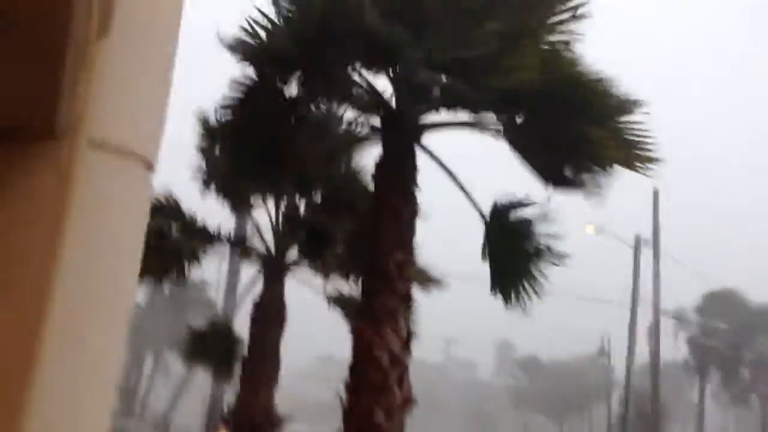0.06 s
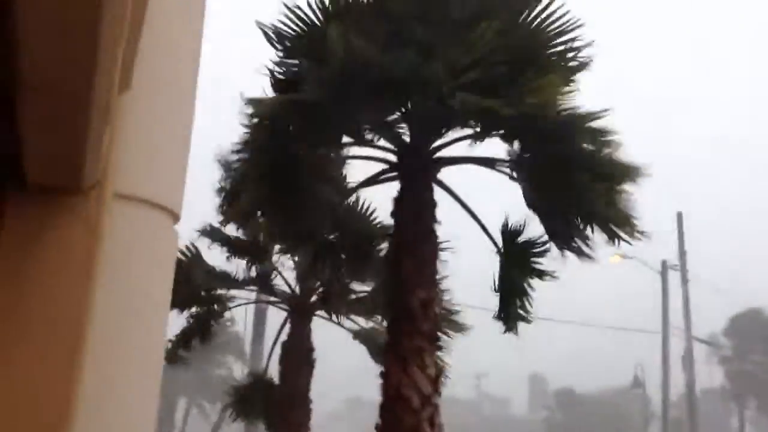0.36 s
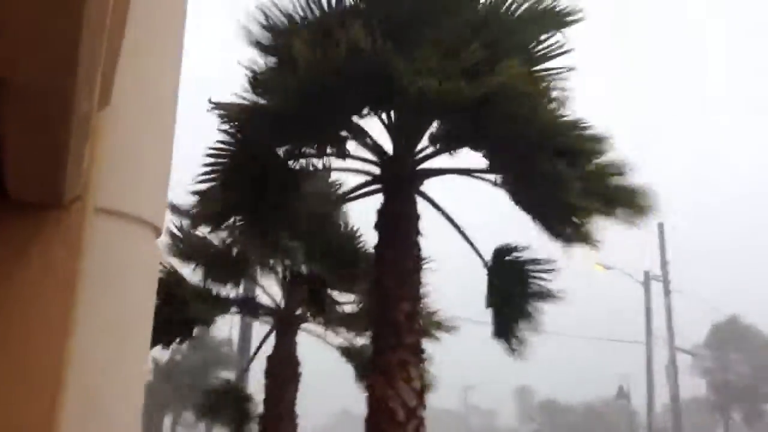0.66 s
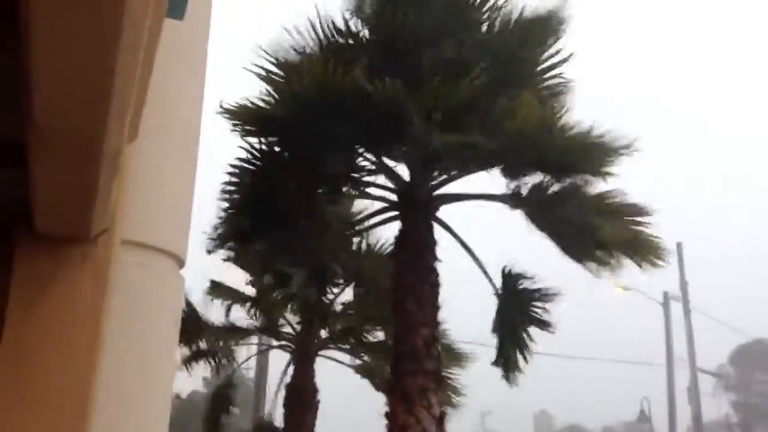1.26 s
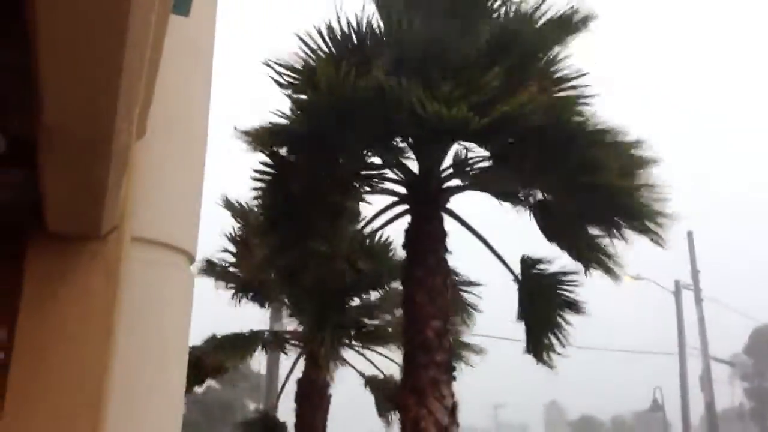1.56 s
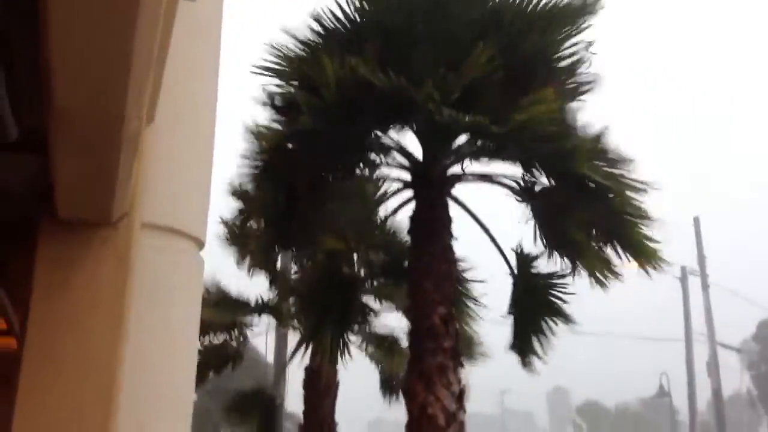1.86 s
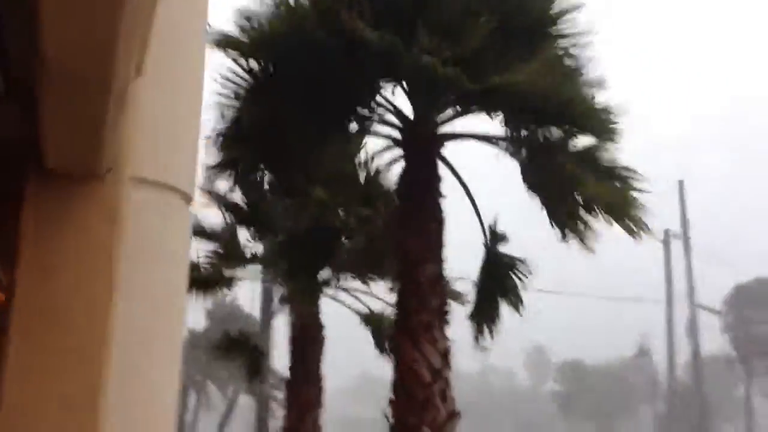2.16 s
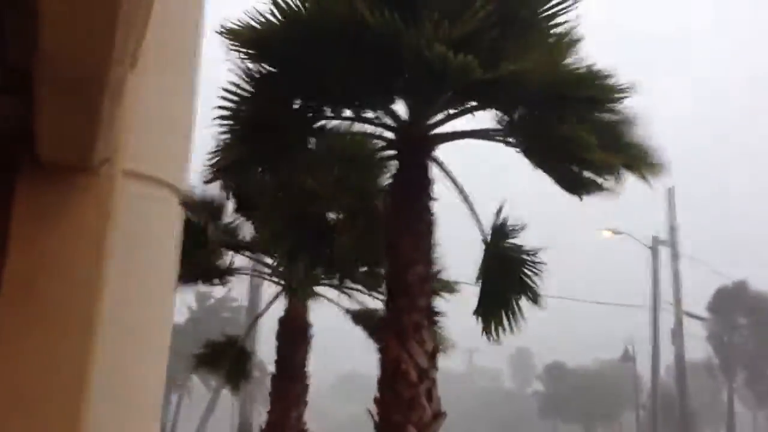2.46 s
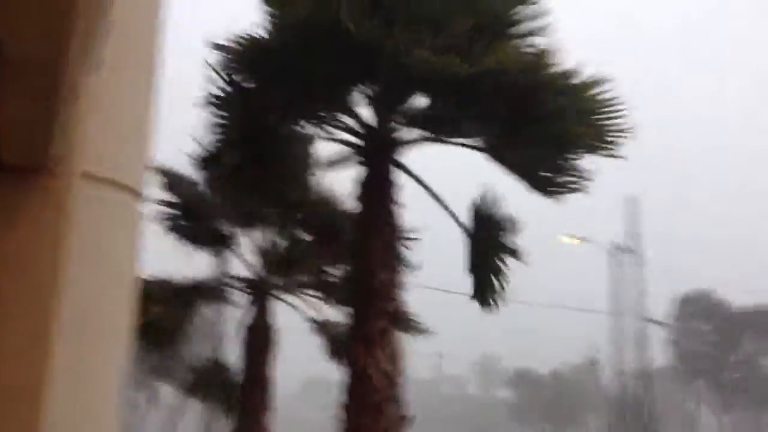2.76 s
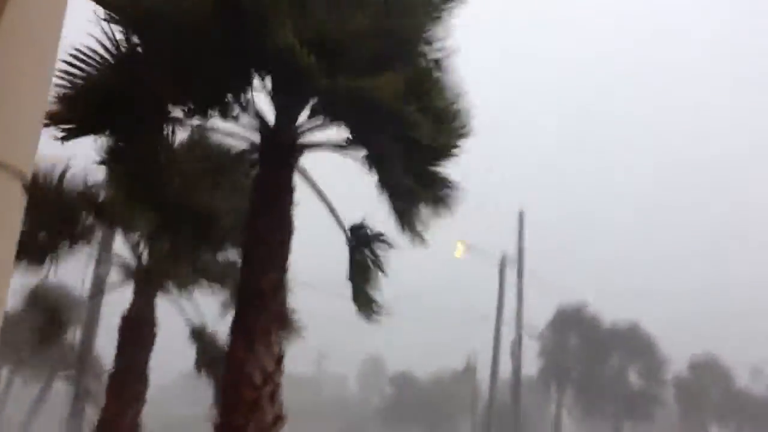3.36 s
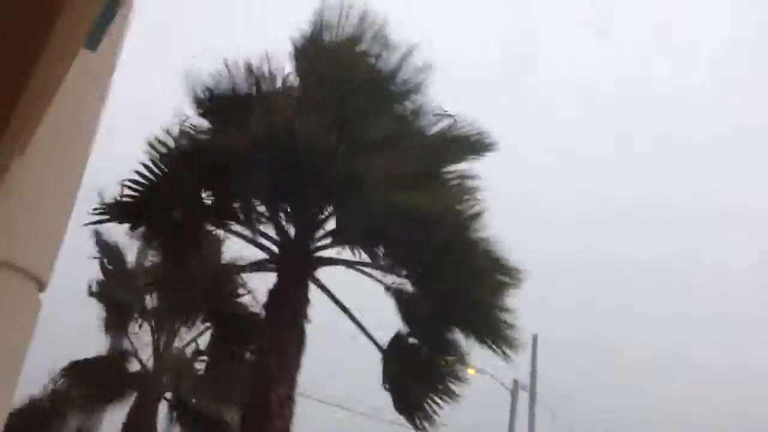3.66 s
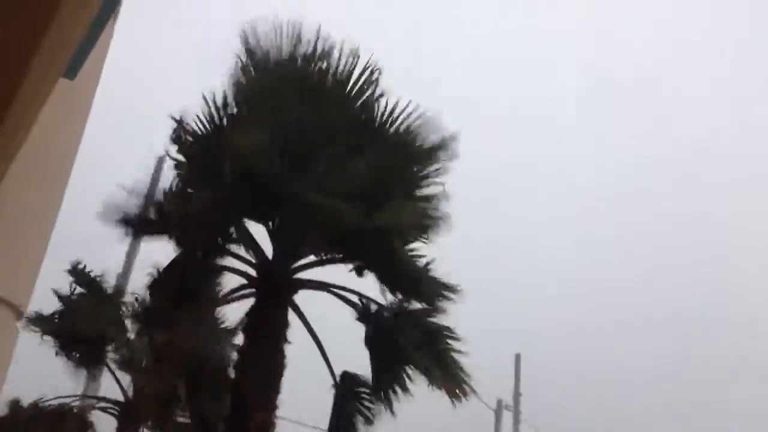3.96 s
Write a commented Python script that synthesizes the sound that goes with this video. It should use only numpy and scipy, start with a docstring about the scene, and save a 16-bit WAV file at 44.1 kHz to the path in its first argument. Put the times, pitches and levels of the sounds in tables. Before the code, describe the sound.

Storm wind blows throughout, heard from under a porch: a steady hiss of rain and thrashing palm fronds over a low roar and faint moaning. Flurries of short low puffs buffet the microphone at about 1.1 to 1.5 seconds and 2.3 to 2.5. The hardest come around 3.5 seconds, briefly dipping the hiss as the roar swells. One drop taps the microphone at 3.8 seconds.

```python
"""A hiss of rain and palm fronds, driven by storm wind, is heard from under a porch.
Beneath it the turbulent air roars, and moans round wires and eaves.
Eddies slap the microphone in flurries of short low puffs; the hardest make the limiter
duck the hiss, which then creeps back. Near the end one drop taps the microphone's housing."""
import sys
import numpy as np
from scipy import signal
from scipy.fft import rfft, irfft, next_fast_len
from scipy.io import wavfile
from scipy.ndimage import uniform_filter1d, minimum_filter1d, map_coordinates

SR = 44100
rng = np.random.default_rng(int(sys.argv[2]) if len(sys.argv) > 2 else 0)


def wav_record(signal):
    """Record a signal, one row per channel, as 16-bit PCM in the file named by sys.argv[1]."""
    frames = np.transpose(np.atleast_2d(signal))
    bounded = np.clip(frames, -1, 1)
    # unit amplitude maps onto the largest positive 16-bit level
    quanta = np.round(bounded * 32767).astype(np.int16)
    wavfile.write(sys.argv[1], SR, quanta)


N = 176400

# force of the storm on rain and fronds: t/s, relative level/dB
GUST_LEVEL = [(0, -1), (.3, -0.5), (.62, 0), (.78, -1.2), (.87, 0.6), (1.0, 1.1), (1.2, -1.2), (1.36, -2.4),
              (1.6, -.5), (1.68, -0.7), (1.85, 0.1), (2.3, -0.7), (2.5, 0.8), (2.76, 0.2), (2.86, 2.5),
              (2.93, 1.5), (3.08, 0.7), (3.17, 1.5), (3.45, 2), (3.7, 1.5), (3.95, 1.7)]
# spectrum of the sheet of rain: f/Hz, relative level/dB
RAIN_SPECTRUM = [(400, -21), (900, 4.5), (1500, -0.5), (3000, 1), (5000, -3), (7500, -3), (10000, -4),
                 (13500, -3.5), (15500, -4)]
# spectrum of the fronds: f/Hz, relative level/dB
FROND_SPECTRUM = [(700, -13), (1500, 0.5), (2800, 0.5), (4000, 1), (6000, -2.5), (12000, -16)]
# surges that whip the fronds: t/s, half-width/s, boost/dB
FROND_SURGES = [(.93, .06, 0.5), (2.785, 0.018, 1.5), (2.864, 0.017, 2.5), (3.18, 0.023, 2.5)]
# spectrum of the roar: f/Hz, relative level/dB
ROAR_SPECTRUM = [(25, -21), (50, -2), (85, -8), (130, -1), (185, 1), (300, -4.5), (450, -7.5), (800, -10),
                 (1500, -19.5), (4000, -50)]
# swell of the roar: t/s, relative level/dB
ROAR_SWELL = [(0, -1), (.55, -0.5), (1.05, 2.5), (1.65, -5), (2.2, -1.5), (2.48, -4), (2.65, -7),
              (2.76, -2), (3.1, -4.5), (3.6, 4), (4, 6)]
# wind tones: f/Hz, half-width/Hz, relative level/dB
MOAN_BANDS = [(518, 110, 1), (702, 84, 2), (836, 600, -33)]
# swell of the moaning: t/s, level/dB
MOAN_SWELL = [(0, -45.5), (.6, -42), (1.2, -45.5), (1.7, -41.5), (2.25, -43), (2.6, -47), (2.85, -42),
              (3.25, -39), (3.6, -44), (4, -43)]
# eddies at the microphone: peak t/s, length/s, relative level/dB, bright part against low part/dB
EDDIES = [(0.182, 0.0054, -30, -1.5), (0.583, 0.01, -29, -24), (1.105, 0.0094, -24, -26),
          (1.131, 0.013, -17.5, -17), (1.144, 0.0055, -12.5, -4.5), (1.216, 0.026, -27, -24),
          (1.239, 0.014, -20.5, -8), (1.266, 0.0088, -23, -22), (1.286, 0.0088, -12.5, -9.5),
          (1.31, 0.012, -12, -11), (1.377, 0.0082, -21, -8), (1.404, 0.009, -14.5, -2.5),
          (1.427, 0.011, -18, -3.5), (1.452, 0.017, -20, -27), (1.532, 0.026, -29.5, -6.5),
          (1.864, 0.016, -32.5, -4.5), (2.12, 0.0034, -29, -21), (2.273, 0.0073, -23, 0),
          (2.294, 0.011, -15.5, -7), (2.315, 0.011, -16, -6), (2.33, 0.008, -14.5, 0),
          (2.353, 0.0099, -21, -0.5), (2.369, 0.0091, -9, 5), (2.416, 0.012, -19, -5.5),
          (2.458, 0.01, -17, 0.5), (2.743, 0.018, -27, -25), (2.908, 0.012, -19, -6),
          (2.958, 0.037, -21.5, -4.5), (3.005, 0.0073, -19.5, 3), (3.239, 0.016, -20.5, -9),
          (3.413, 0.011, -21, -9), (3.428, 0.0069, -13, 6), (3.449, .016, -8.5, -3.5),
          (3.473, 0.012, -4, -.5), (3.513, 0.017, -9, -4.5), (3.522, 0.008, -12.5, -1),
          (3.534, 0.0074, -12.5, -5), (3.657, 0.0099, -17, 0), (3.683, 0.015, -14.5, 3),
          (3.719, 0.0075, -14.5, -5.5)]
# spectrum of an eddy's low part: f/Hz, relative level/dB
PUFF_SPECTRUM = [(30, -3.5), (60, -3), (90, -11), (140, 1.5), (200, 3.5), (280, 3.5), (480, -12),
                 (700, -14.5), (1000, -45), (1600, -34), (4000, -72)]
# spectrum of its bright tearing: f/Hz, relative level/dB
TEAR_SPECTRUM = [(100, -13), (300, 1), (480, 4.5), (750, -7.5), (1200, -20.5), (2000, -35), (4000, -56),
                 (9000, -80)]
# modes of the housing: f/Hz, relative level/dB, T60/s
HOUSING_MODES = [(535, -1.5, 0.0096), (985, -10, 0.05), (1550, 0, 0.013), (2110, 6, 0.0044)]

RAIN_DB, FRONDS_DB, SPLASH_DB, ROAR_DB, PUFF_DB = -36, -39.5, -49.5, -38.5, -2.5  # base gains
LOW_CUT_HZ, TOP_HZ = 132, 15550


def amp(db):
    """Decibels to amplitude ratio."""
    return 10 ** (np.asarray(db) / 20)


def unit(x):
    """Scale to rms 1."""
    return x / np.sqrt(np.mean(x ** 2) + 1e-20)


def curve(rows):
    """Interpolate (t/s, value) points at every sample."""
    return np.interp(np.arange(N) / SR, *np.transpose(rows))


def wobble(per_s):
    """A smooth random curve with per_s knots a second."""
    return map_coordinates(rng.standard_normal(1024), [np.arange(N) * per_s / SR], mode="mirror")


def filtered(x, response):
    """Linear filtering: multiply the spectrum by a frequency response."""
    size = next_fast_len(N + SR // 2)
    return irfft(rfft(x, size) * response(np.fft.rfftfreq(size, 1 / SR)), size)[..., :N]


def coloured(x, spectrum):
    """Shape x by (f/Hz, level/dB) points on a log frequency axis, then scale to rms 1."""
    f, db = np.transpose(spectrum)
    return unit(filtered(x, lambda hz: amp(np.interp(np.log(hz + 1), np.log(f + 1), db))))


def rush(spectrum, patchy_db):
    """Coloured noise, modulated in random patches of time and frequency."""
    cells = signal.stft(rng.standard_normal(N), nperseg=512)[2]
    patches = uniform_filter1d(rng.standard_normal(cells.shape), size=7, axis=0)
    patches = unit(uniform_filter1d(patches, size=14, axis=1))
    noise = signal.istft(cells * amp(patchy_db * patches), nperseg=512)[1][:N]
    return coloured(noise, spectrum)


def rain(gust_db):
    """Countless drop impacts add incoherently to a broadband hiss that follows the gusts."""
    return amp(RAIN_DB + gust_db + 0.083 * wobble(11)) * rush(RAIN_SPECTRUM, patchy_db=0.47)


def fronds(gust_db):
    """Forced motion: wind thrashes the fronds, whose hiss grows with each gust and surge."""
    t = np.arange(N) / SR
    surge_db = sum(db * 2 ** -((t - peak_s) / width) ** 2 for peak_s, width, db in FROND_SURGES)
    level_db = FRONDS_DB + 0.72 * gust_db + surge_db + 0.32 * wobble(15)
    return amp(level_db) * rush(FROND_SPECTRUM, patchy_db=1.5)


def splashes(gust_db, per_s=720, centre_hz=3940, t60_cycles=5.2):
    """Impacts excite damped oscillations: near drops and leaves tick at random pitch and size."""
    count = int(per_s * N / SR)
    when, pitch, size = rng.random((count, 3)).T[:, :, None]
    age = np.arange(SR // 250)  # samples since impact
    cycles = np.minimum(centre_hz * 3 ** (2 * pitch - 1), TOP_HZ) * age / SR
    strength = amp(-4 * np.log(1 - .99 * size))  # many faint, few loud
    ticks = strength * np.sin(2 * np.pi * cycles) * np.exp(-np.log(1000) * cycles / t60_cycles)
    samples = (when * N).astype(int) + age
    patter = np.bincount(samples.ravel(), ticks.ravel(), N)[:N]
    return amp(SPLASH_DB + gust_db) * unit(patter)


def roar():
    """Turbulence in the air passing the porch makes a lumpy low rush."""
    level_db = ROAR_DB + curve(ROAR_SWELL) + 0.68 * wobble(22.3)
    return amp(level_db) * rush(ROAR_SPECTRUM, patchy_db=-1.5)


def moan():
    """Aeolian tones: flow round wires and eaves sounds in broad bands, each wavering on its own."""
    tones = np.zeros(N)
    for hz, width, db in MOAN_BANDS:
        band = unit(filtered(rng.standard_normal(N), lambda f: 1 / (1 + ((f - hz) / width) ** 2)))
        tones += amp(db + 3.2 * wobble(5.98)) * band
    return amp(curve(MOAN_SWELL)) * unit(tones)


def churn(spectrum):
    """Turbulent pressure, divided by its local rms to be even over the span of one eddy."""
    pressure = coloured(rng.standard_normal(N), spectrum)
    local_power = np.abs(signal.fftconvolve(pressure ** 2, np.hanning(SR // 90), "same"))
    return unit(pressure / np.sqrt(local_power + 1e-9))


def buffeting(rise_share=0.31, skirt_db=-19, skirt_ratio=4.9, flutter_db=1.5):
    """Eddies press on the microphone as low puffs with brighter tearing; their powers add."""
    t = np.arange(N) / SR
    low_power, bright_power = np.zeros((2, N))
    for peak_s, length, db, bright_db in EDDIES:
        offset = (t - peak_s) / length / np.where(t < peak_s, rise_share, 1 - rise_share)
        core = 2 ** -offset ** 2
        skirt = amp(skirt_db) ** 2 * 2 ** -(offset / skirt_ratio) ** 2  # weaker, wider turbulence
        low_power += amp(db) ** 2 * (core + skirt)
        bright_power += amp(db + bright_db) ** 2 * core
    ragged_gain = amp(PUFF_DB + flutter_db * wobble(93))
    puffs = np.sqrt(low_power) * churn(PUFF_SPECTRUM)
    tearing = np.sqrt(bright_power) * churn(TEAR_SPECTRUM)
    return ragged_gain * (puffs + tearing)


def housing_tap(start_s=3.7986, gain_db=-7.5, band_hz=(340, 1660)):
    """A drop excites the housing's damped modes; the soft blow carries neither bass nor treble."""
    t = np.maximum(np.arange(N) / SR - start_s, 0)
    ring = sum(amp(db) * np.sin(2 * np.pi * hz * t) * np.exp(-np.log(1000) * t / t60)
               for hz, db, t60 in HOUSING_MODES)
    soft_blow = signal.butter(2, band_hz, "bandpass", fs=SR, output="sos")
    return amp(gain_db) * signal.sosfilt(soft_blow, ring)


def scene():
    """Superposition: all pressures add into one signal, which plays alike in both channels."""
    gust_db = curve(GUST_LEVEL)
    wind = buffeting() + roar() + moan()
    mono = wind + rain(gust_db) + fronds(gust_db) + splashes(gust_db) + housing_tap()
    return np.array([mono, mono])


def record(dry, ceiling_db=-9, sense_s=.006, hold_s=.1, release_db_per_s=8):
    """Limiting, between a wind filter and a treble cut: gain drops at once, holds, recovers slowly."""
    wind_filter = signal.butter(3, LOW_CUT_HZ, "highpass", fs=SR, output="sos")
    x = signal.sosfilt(wind_filter, dry)
    power = np.abs(uniform_filter1d(x[0] ** 2, int(sense_s * SR)))
    over_db = np.maximum(10 * np.log10(power + 1e-12) - ceiling_db, 0)
    half_hold = int(hold_s * SR / 2)
    held_db = -minimum_filter1d(-over_db, 2 * half_hold + 1, origin=half_hold)  # recent maximum
    recovery_db = release_db_per_s * np.arange(N) / SR
    duck_db = np.maximum.accumulate(held_db + recovery_db) - recovery_db
    gain = amp(-uniform_filter1d(duck_db, size=128))
    return filtered(x * gain, lambda hz: hz < TOP_HZ)


dry = scene()
out = record(dry)
wav_record(out)
```